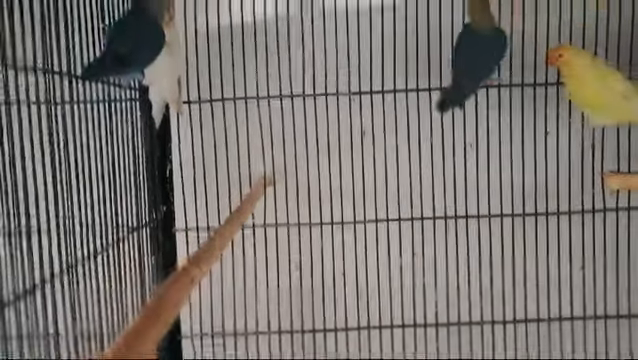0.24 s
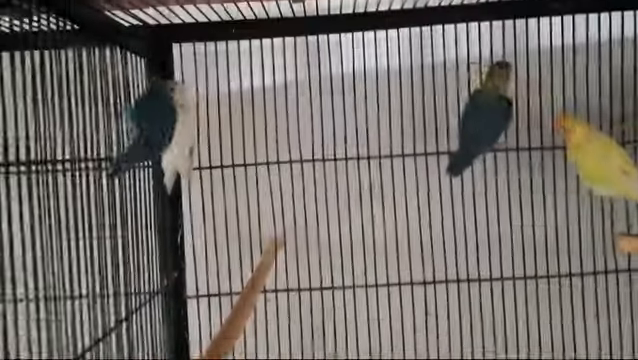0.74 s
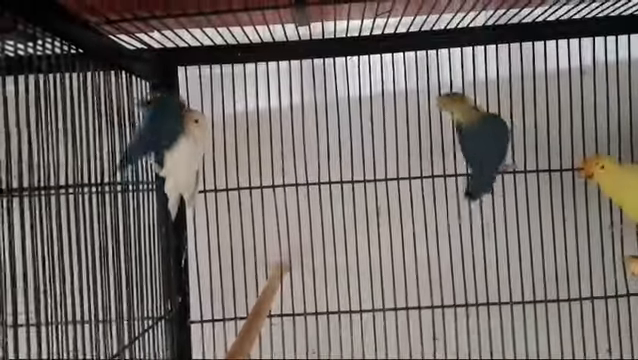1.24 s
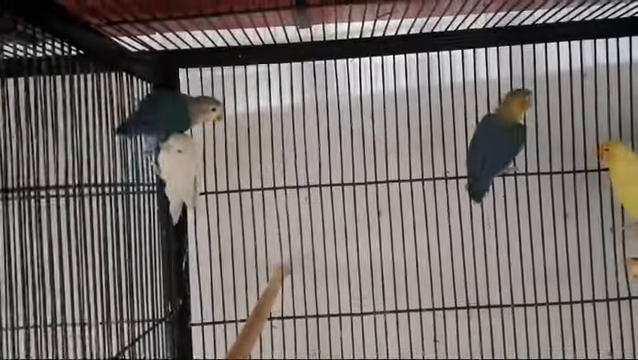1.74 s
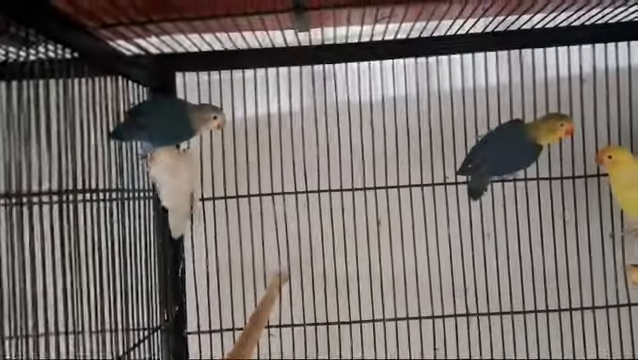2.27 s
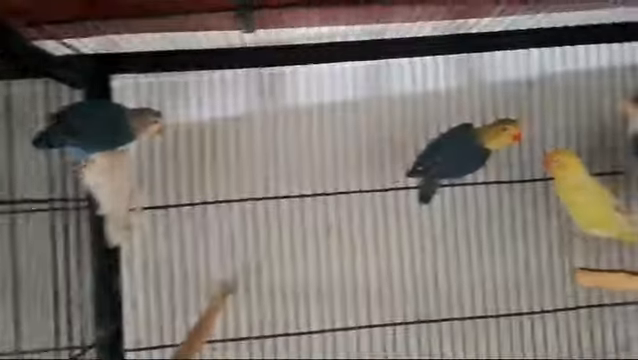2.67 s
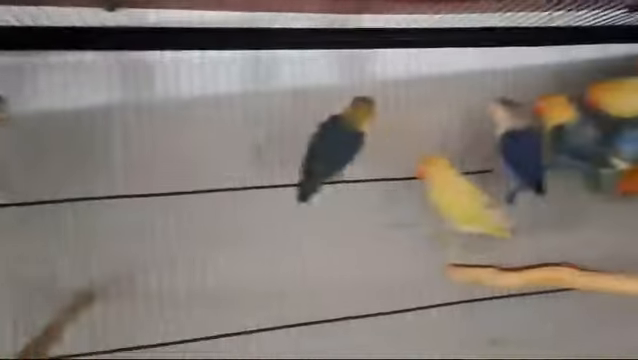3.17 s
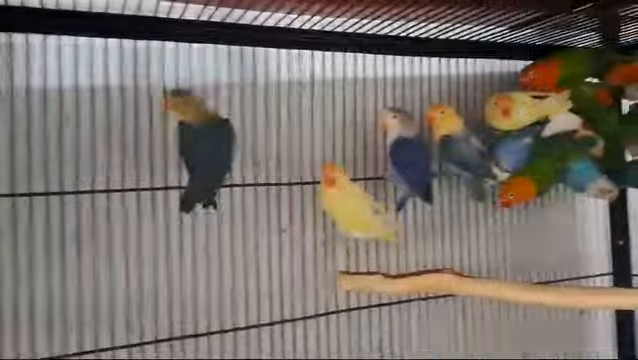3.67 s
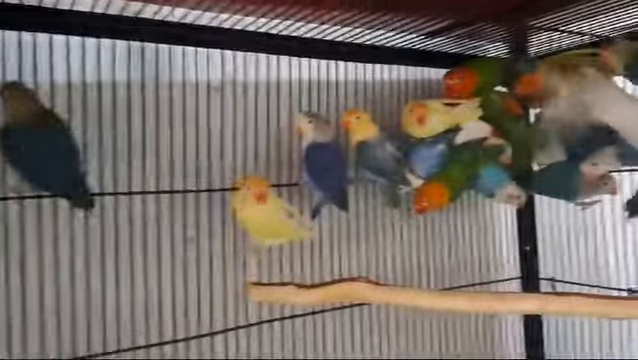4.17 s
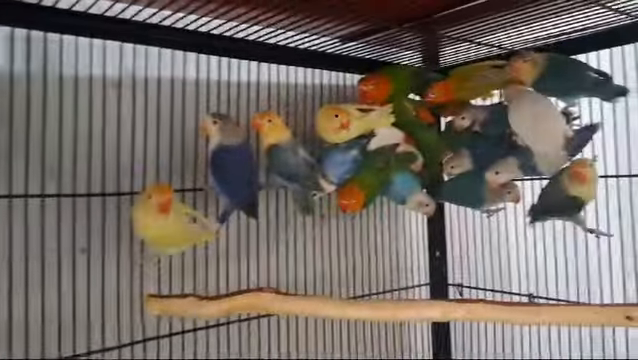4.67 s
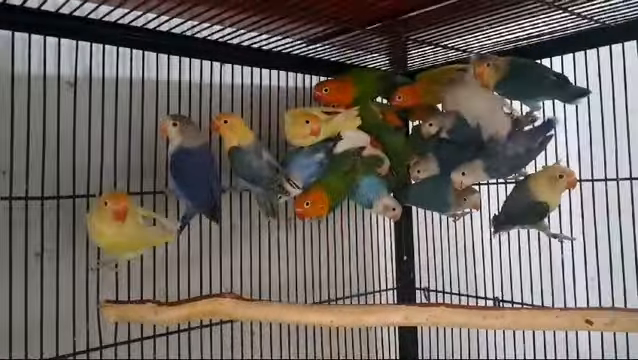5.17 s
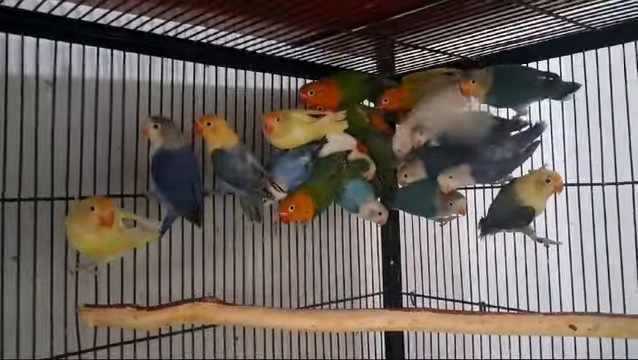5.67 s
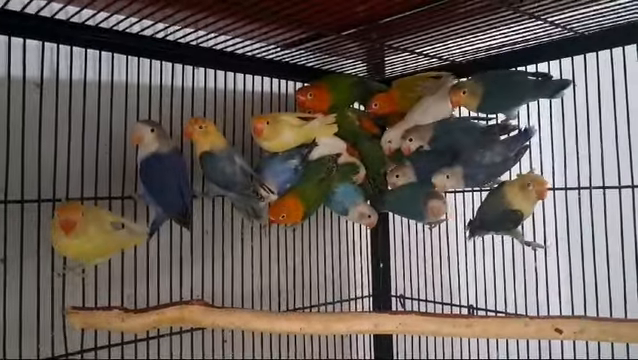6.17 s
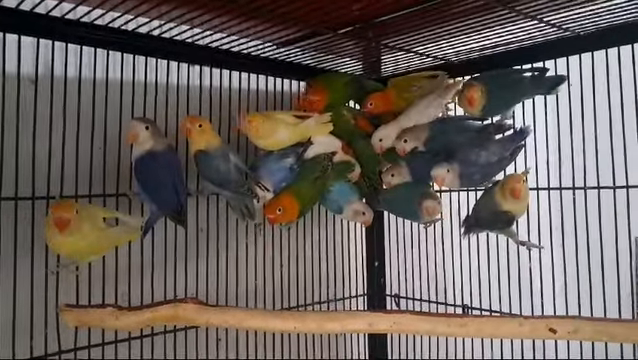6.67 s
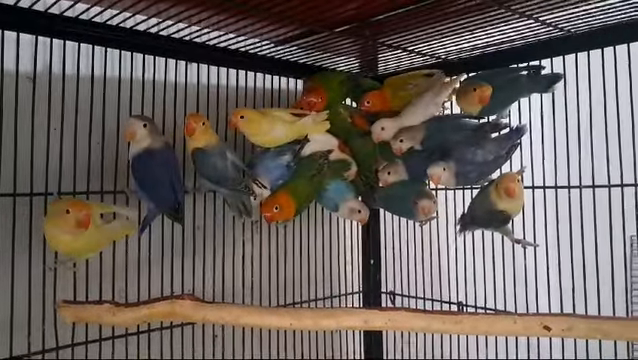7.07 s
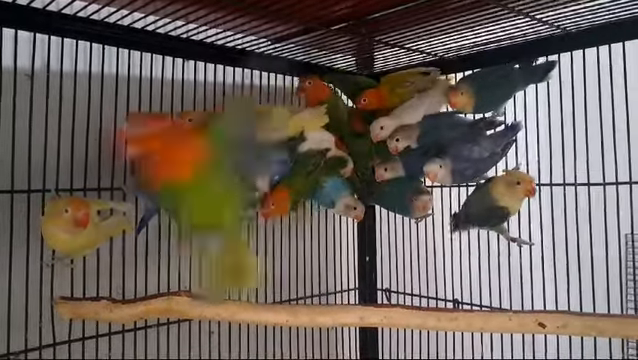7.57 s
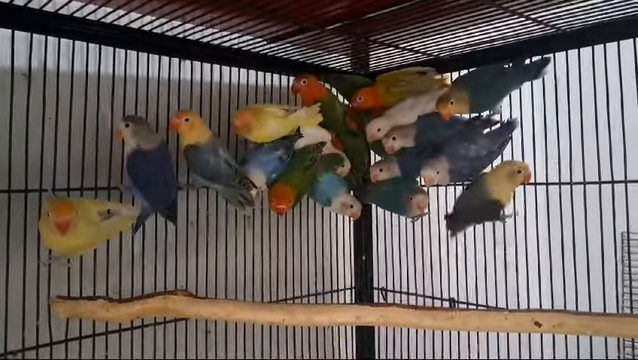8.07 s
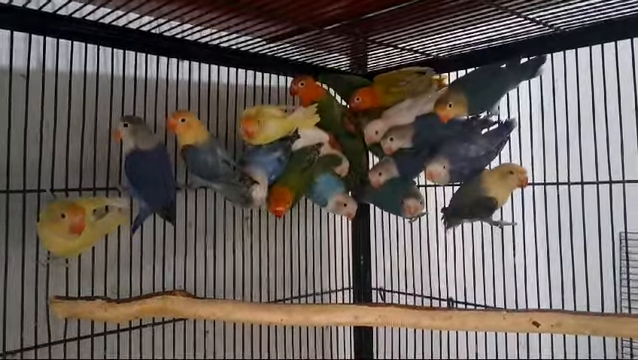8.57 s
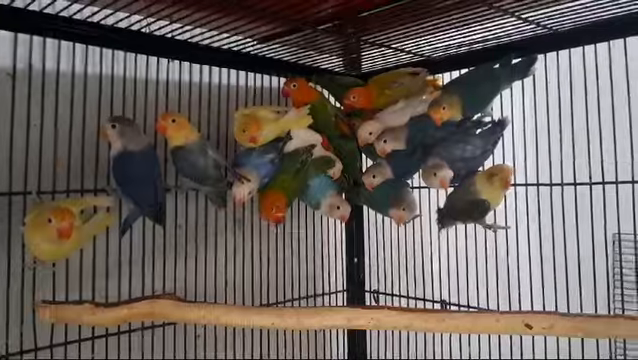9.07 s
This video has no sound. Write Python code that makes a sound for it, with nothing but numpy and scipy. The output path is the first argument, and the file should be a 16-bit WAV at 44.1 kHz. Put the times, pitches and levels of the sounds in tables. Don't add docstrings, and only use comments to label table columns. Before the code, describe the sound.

Indoor aviary heard at arm's length: piercing, very short peeps, buzzy squeaks and tick-like calls overlap irregularly with tiny lulls. Bursts thicken around the middle, followed by rough, rapidly chopped squawks and two climbing trills. A faint wing flutter passes late, over slightly stronger low rumble, and a final few bright chirps ring off hard walls. Stereo, leaning a little right, with distant flock calls behind.

```python
import sys
import numpy as np
from scipy import signal
from scipy.fft import rfft, irfft, next_fast_len
from scipy.io import wavfile
from scipy.ndimage import uniform_filter1d, minimum_filter1d, map_coordinates

SR = 44100
rng = np.random.default_rng(int(sys.argv[2]) if len(sys.argv) > 2 else 0)


def volts_from_db(level):
    exponent = np.asarray(level, float) / 20
    return 10 ** exponent


def bounce(signal):
    frames = np.transpose(np.atleast_2d(signal))
    limited = np.clip(frames, -1, 1)
    pcm = np.round(limited * 32767).astype(np.int16)
    wavfile.write(sys.argv[1], SR, pcm)


N = 411453


def unit(x):
    return x / np.sqrt(np.mean(x ** 2) + 1e-20)


def along(points, hz):
    f, v = np.transpose(points)
    return np.interp(np.log(hz + 1), np.log(f + 1), v)


def curves(rows):
    s, *cols = np.transpose(rows)
    return [np.interp(np.arange(N) / SR, s, c) for c in cols]


def wobble(size, rate):
    count = size // 8 + 8
    knots = rng.standard_normal(max(count, 3000))[:count]
    return map_coordinates(knots, [np.arange(size) * min(rate / SR, 1 / 8)])


def filtered(x, response):
    m = next_fast_len(N + SR // 2)
    spectrum = rfft(x, m) * response(np.fft.rfftfreq(m, 1 / SR))
    return irfft(spectrum, m)[..., :N]


# (frequency [Hz], gain [dB])
BEAK_GAIN = [(880, -84), (1500, -66), (1940, -12), (2210, -15.5), (3380, -3), (4240, -3), (4970, -0.5),
             (5380, -4.5), (6700, -5.5), (8160, -19), (9470, -17), (12400, -15.5), (16000, -31)]


def syrinx(pitch_hz, tilt_db, jitter, flutter_db, breath, wander=0.01126):
    size = len(pitch_hz)
    pitch_hz = pitch_hz * (1 + jitter * wobble(size, rate=900) + wander * wobble(size, rate=70))
    k = np.arange(1, 9)[:, None]
    gain_db = along(BEAK_GAIN, np.abs(k * pitch_hz)) + tilt_db * np.log2(k)
    gain = volts_from_db(gain_db) * (k * pitch_hz < SR / 2)
    gain = gain * volts_from_db(rng.normal(0, 2, k.shape))
    gain = gain / gain.mean(axis=1).max()
    turns = k * np.cumsum(pitch_hz) / SR + rng.random(k.shape)
    tone = np.sum(gain * np.sin(2 * np.pi * turns), axis=0)
    flutter = volts_from_db(flutter_db * wobble(size, rate=272))
    return np.sqrt(2) * tone * flutter * (1 + breath * wobble(size, rate=3500))


# (time [s], left-right level [dB])
PHONE_TURN = [(0.0, -3.5), (1.2, -4.5), (1.7, -4.5), (2.2, -3.5), (3.7, -2.5), (4.2, -3), (5.1, -6),
              (7.7, -5), (8.2, -5), (9.33, -7.5)]


def add(out, sound, s):
    pan_db = np.interp(s, *np.transpose(PHONE_TURN)) + rng.normal(0, 2.7)
    left = round(s * SR)
    right = left + rng.integers(14, 23)
    out[0, left:][:len(sound)] += volts_from_db(pan_db / 2) * sound
    out[1, right:][:len(sound)] += volts_from_db(-pan_db / 2) * sound


def notes(rows, scoop, crack, jitter, flutter_db, breath, snap=0, fade_db=0):
    out, last_s, last_hz = np.zeros((2, N + SR)), -1, 1
    for s, length, start_hz, end_hz, db, tilt_db in rows:
        u = np.linspace(0, 1, max(round(length * SR), 32))
        fresh = s - last_s > .006 or abs(start_hz / last_hz - 1) > .06
        onset = fresh * np.exp(-u * length / 0.00418)
        leap = snap * (length < .016) * np.exp((u - 1) * length / .0025)
        pitch_hz = (start_hz + (end_hz - start_hz) * u) * (1 - scoop * onset + leap)
        opening = np.minimum(1, u * length / 0.001)
        closing = np.sqrt(np.clip((1 - u) * 5, 0, 1)) * volts_from_db(fade_db * u)
        unsteady = jitter + crack * onset + leap / 2
        voice = syrinx(pitch_hz, tilt_db, unsteady, flutter_db, breath)
        add(out, volts_from_db(db) * opening * closing * voice, s)
        last_s, last_hz = s + length, end_hz
    return out[:, :N]


# (time [s], length [s], start pitch [Hz], end pitch [Hz], level [dB])
SQUEAKS = [(.206, 0.024, 2220, 2230, -27), (.27, 0.018, 2553, 2580, -29), (1.02, 0.026, 2030, 2150, -17.5),
           (1.045, 0.045, 2230, 2320, -17), (1.245, 0.049, 2350, 2290, -34),
           (1.465, 0.038, 2280, 2460, -20.5), (2.11, 0.066, 2117, 2385, -30),
           (2.896, 0.035, 2076, 2310, -21.5), (2.923, 0.017, 2453, 2320, -19),
           (2.94, 0.03, 2340, 2416, -17), (2.966, .028, 2443, 2634, -15.5),
           (3.297, 0.019, 1834, 2136, -23.5), (3.46, 0.064, 2380, 2660, -29),
           (3.62, 0.011, 2120, 2040, -27), (3.803, 0.068, 2037, 2380, -22),
           (4.043, 0.0108, 2100, 2100, -32), (5.122, 0.026, 2164, 2270, -18.5),
           (5.52, 0.0074, 2160, 2250, -26), (6.893, 0.016, 2214, 2116, -28), (6.88, 0.017, 3170, 3050, -22),
           (7.275, 0.037, 2750, 3160, -24.5), (7.637, 0.039, 2738, 2510, -20.5),
           (8.557, 0.024, 2230, 2350, -37.5), (9.122, 0.012, 2017, 2100, -24)]
# (time [s], low pitch [Hz], high pitch [Hz], whistle length [s], level [dB])
CHIRPS = [(1.215, 2266, 5650, 0.02, -10), (3.312, 2260, 5480, 0.0286, -12.5),
          (4.132, 2058, 5270, 0.028, -13.5), (4.292, 1857, 6420, 0.02, -23.5),
          (4.369, 2083, 5320, 0.033, -11.5), (4.454, 2014, 6220, 0.043, -18.5),
          (4.598, 2134, 5340, 0.0315, -13), (4.848, 2195, 5310, 0.021, -12.5),
          (5.364, 2234, 5380, 0.023, -13), (5.46, 2480, 5415, .014, -11), (5.652, 2220, 5840, 0.026, -17),
          (5.75, 2263, 5670, 0.02, -17.5), (5.83, 2283, 5760, 0.0352, -20), (8.715, 2224, 6280, 0.028, -15),
          (8.92, 2116, 5970, 0.039, -17)]
# (time [s], low pitch [Hz], high pitch [Hz], whistle length [s], level [dB])
SHRIEKS = [
    (5.248, 2100, 6130, 0.027, -18),
    (5.555, 2253, 5780, 0.022, -20.5),
    (6.19, 1873, 6210, 0.019, -18.5),
    (8.045, 2104, 6180, 0.03, -21),
]


def squeaks():
    length_s, rise, quieter_db = 0.015, 0.039, -2.4
    leads = [(s, length_s, low, low * (1 + rise), db + quieter_db)
             for s, low, high, hold, db in CHIRPS + SHRIEKS]
    return [(*row, 4 + 0.37 * (row[-1] + 13.5)) for row in sorted(SQUEAKS + leads)]


# (time [s], length [s], pitch [Hz], level [dB])
PIPES = [(.001, 0.005, 5800, -20), (.14, 0.022, 5900, -25.5), (.203, 0.014, 6000, -15.5),
         (.866, 0.027, 6820, -12.5), (1.003, 0.038, 6080, -14.5), (1.045, 0.055, 6710, -12.5),
         (1.128, .014, 5500, -15), (1.15, 0.0062, 5970, -11), (1.245, 0.01, 7360, -18),
         (1.27, 0.0057, 6740, -16), (1.295, 0.0081, 5230, -12.5), (1.303, 0.0095, 6600, -15),
         (1.33, 0.011, 5550, -20), (1.408, 0.011, 4720, -21), (1.447, 0.018, 5410, -15),
         (1.465, 0.025, 5100, -18), (1.518, 0.0076, 5520, -15), (1.575, 0.014, 4850, -17),
         (1.712, 0.0073, 5750, -22), (2.03, 0.031, 4030, -26), (2.065, 0.024, 5625, -15.5),
         (2.14, 0.043, 4710, -34.5), (2.172, 0.037, 5590, -16), (2.99, 0.041, 5164, -13),
         (2.995, 0.025, 6520, -11.5), (3.346, 0.012, 6480, -8.5), (3.499, 0.034, 5350, -11),
         (3.564, 0.036, 6670, -15.5), (3.62, 0.037, 5830, -30),
         (5.125, .024, 4350, -16), (5.147, 0.042, 6020, -16), (5.148, 0.024, 5350, -15.5),
          (5.472, 0.011, 4320, -14), (5.491, 0.013, 5084, -11.5), (5.204, 0.014, 4430, -16.5),
          (5.575, 0.015, 4990, -15), (5.671, 0.028, 5180, -17), (5.841, 0.038, 6570, -21),
          (5.773, 0.022, 5050, -19), (5.797, 0.034, 4276, -20), (6.235, 0.033, 6240, -24.5),
          (6.306, 0.024, 5970, -25), (6.555, 0.0082, 6030, -24), (6.643, 0.015, 6430, -12),
          (6.834, 0.0094, 4110, -35), (6.837, 0.023, 6320, -22), (6.853, 0.015, 6380, -15),
          (6.967, 0.064, 5910, -24.5), (7.023, 0.032, 6020, -22), (7.308, 0.024, 5260, -24.5),
          (7.335, .012, 4580, -24), (7.443, 0.039, 4800, -23), (7.627, 0.014, 4610, -18.5),
          (7.664, 0.021, 5170, -17), (7.8, 0.022, 4870, -18.5), (8.056, .026, 6090, -18),
          (8.566, 0.082, 6560, -36.5), (9.129, 0.036, 4270, -15), (9.171, 0.04, 6430, -10)]
# (time [s], length [s], middle pitch [Hz], level [dB])
FALLS = [(.228, .012, 6450, -34.5), (.636, 0.012, 6300, -4), (.649, .01, 5460, -18.5),
         (.825, 0.024, 6700, -12), (.843, 0.0053, 5660, -14), (.848, 0.015, 4420, -13),
         (1.1, .05, 6010, -16.5), (1.232, 0.035, 5740, -29.5), (1.345, 0.026, 5010, -19.5),
         (1.496, 0.012, 6240, -10), (3.562, 0.023, 5410, -12.5), (3.847, 0.0245, 6350, -14),
         (3.873, 0.027, 6530, -11), (3.894, 0.021, 5450, -9), (6.081, 0.038, 6120, -16.5),
         (6.347, 0.045, 6130, -19.5), (6.496, 0.031, 5980, -17.5), (6.614, 0.037, 5720, -16.5),
         (6.767, 0.04, 5780, -17.5), (6.908, .036, 5750, -14), (7.05, 0.04, 5900, -18.5),
         (7.703, 0.018, 6400, -20.5), (7.716, 0.034, 5680, -16.5), (7.84, 0.037, 5455, -15),
         (7.958, 0.031, 5390, -15), (8.751, 0.025, 5450, -13.5)]
# (time [s], length [s], middle pitch [Hz], level [dB])
RISES = [(.661, 0.028, 6500, -14), (1.225, 0.027, 4630, -30), (1.423, 0.021, 4520, -17.5),
         (2.11, 0.027, 6140, -35), (2.972, 0.013, 6200, -21), (3.325, .02, 6260, -20),
         (3.425, .022, 6270, -18), (3.494, 0.014, 5850, -18), (3.524, 0.02, 4380, -11.5),
         (3.546, 0.0085, 4900, -8), (5.06, 0.0198, 4230, -16), (5.392, 0.0091, 6000, -20),
         (5.539, 0.052, 6300, -22), (5.71, .03, 6150, -18.5), (8.721, 0.017, 4965, -19.5),
         (9.162, .009, 4730, -19)]


def whistles():
    break_s = 0.011
    tops, shrieks = ([(s + break_s, hold, high, db) for s, low, high, hold, db in rows]
                     for rows in (CHIRPS, SHRIEKS))
    # (whistles, glide as a share of pitch, brightness [dB per octave])
    kinds = [(peeps(), 0.069, 8.5), (shrieks, 0.036, 12.3), (tops, -0.032, 1),
             (PIPES, 0.015, -2.5), (FALLS, -0.07, 0.027), (RISES, 0.06, 1)]
    return sorted((s, length, hz * (1 - glide / 2), hz * (1 + glide / 2), db, tilt_db)
                  for rows, glide, tilt_db in kinds for s, length, hz, db in rows)


# (time [s], peak level [dB])
TICKS = [(0.0502, -13.5), (0.074, -14.5), (0.141, -7.5), (0.2684, -14.5), (0.3702, -10), (.624, -14.5),
         (0.818, -7.5), (0.91, -32), (.978, -20), (0.988, -7), (1.358, -27), (1.5646, -11.5), (3.423, -3),
         (4.0557, -13), (4.568, -22), (4.688, -9.5), (4.748, -12.5), (4.805, -19), (4.908, -18),
         (4.933, -13), (4.996, -17), (5.034, -11), (5.094, -6), (5.194, -10), (6.0762, -7.5), (6.1407, -7),
         (6.834, -15), (6.884, -30), (7.445, -13), (7.9428, -12.5)]
# (first time [s], gap [s], first level [dB], swell [dB per tick])
RUNS = [
    (.435, .067, -13.5, 1.3),
    (1.643, .0952, -11, .2),
]
RUN_COUNTS = (6, 5)


def ticks():
    runs = [(s + k * gap, db + k * swell)
            for (s, gap, db, swell), count in zip(RUNS, RUN_COUNTS) for k in range(count)]
    rows = [(max(s - .002, 0), .01, 2300, 4000, db - 14, 2.5) for s, db in runs + TICKS]
    return notes(rows, scoop=0.06, crack=0.049, jitter=0.16, flutter_db=3, breath=0.77, fade_db=-12)


def peeps():
    first, gap = RUNS[-1][:2]
    after_s, length_s, pitch_hz, db = 0.0099, 0.024, 4520, -23.5
    return [(first + k * gap + after_s, length_s, pitch_hz, db) for k in range(RUN_COUNTS[-1] - 1)]


def chopped(tracks, beat, depth, **voice):
    out = np.zeros((2, N + SR))
    for rows in tracks:
        s, pitch_hz, db = np.transpose(rows)
        t = np.arange(s[0], s[-1], 1 / SR)
        turns = np.cumsum(beat * (1 + 0.067 * wobble(len(t), rate=43))) / SR
        chop = np.abs(np.sin(np.pi * turns)) ** depth
        closing = np.minimum(1, (s[-1] - t) / 0.021)
        level = volts_from_db(np.interp(t, s, db) + 1.5)
        add(out, level * chop * closing * syrinx(np.interp(t, s, pitch_hz), **voice), s[0])
    return out[:, :N]


# (time [s], pitch [Hz], level [dB])
TRILLS = [
    [(6.35, 3280, -21), (6.4, 3670, -13.5), (6.46, 4290, -7), (6.54, 4520, -22), (6.75, 4970, -23)],
    [(7.06, 3677, -13), (7.11, 3940, -8.5), (7.16, 4283, -10), (7.2, 4450, -17), (7.24, 4450, -43)],
]


def trills():
    return chopped(TRILLS, beat=128, depth=7, tilt_db=-10, jitter=.018, flutter_db=1.5, breath=.2)


# (time [s], length [s], start pitch [Hz], end pitch [Hz], level [dB])
SQUAWKS = [
    (0.299, 0.043, 2282, 2310, -25),
    (6.286, 0.24, 2362, 2800, -27.5),
    (6.545, 0.25, 2310, 2505, -26),
    (6.966, .07, 2950, 2504, -20),
    (7.049, .13, 2740, 2455, -18),
    (7.244, 0.12, 2575, 3070, -24.5),
    (7.459, 0.11, 2596, 2610, -18.5),
    (7.654, 0.06, 2580, 2466, -22.5),
    (7.772, 0.077, 2570, 2262, -20),
]


def squawks():
    fade_db = 0.5
    tracks = [[(s, start_hz, db), (s + length, end_hz, db - fade_db)]
              for s, length, start_hz, end_hz, db in SQUAWKS]
    return chopped(tracks, beat=150, depth=.9, tilt_db=4, jitter=.065, flutter_db=2, breath=.25, wander=.035)


# (time [s], level [dB])
FLOCK = [(0, -36.5), (.2, -28), (.45, -41.5), (1.19, -25.5), (1.25, -18.5), (1.7, -32), (2.15, -25),
         (2.25, -71), (3.3, -50), (3.45, -20.5), (4.4, -48.5), (4.8, -24.5), (5.4, -40), (6.3, -22),
         (7.4, -30.5), (8.06, -75), (8.52, -52), (9.33, -46)]


def flock(count=420):
    when, long, pitch, glide, loud, bright, high = rng.random((count, 7)).T
    s = (np.arange(count) + when) * N / SR / count
    start_hz = np.where(high > .45, 4100 + 2700 * pitch, 2050 + 500 * pitch)
    end_hz = start_hz * (.95 + 0.198 * glide)
    rows = np.transpose([s, 0.0088 + 0.0289 * long, start_hz, end_hz, 6 * loud, 6 * bright - 2.5])
    calls = notes(rows, scoop=0.1052, crack=0.07, jitter=0.032, flutter_db=3.5, breath=.4)
    return volts_from_db(curves(FLOCK)[0]) * unit(calls)


# (frequency [Hz], time to fall 60 dB [s])
WALLS = [(2000, 0.82), (6000, 0.47), (12000, 0.32)]


def room(x, span=.4):
    out, step = np.zeros((2, N + 2 * SR)), round(span * SR)
    for i in range(0, N, step):
        hz, t, z = signal.stft(rng.standard_normal((2, SR * 3 // 4)), SR, nperseg=256)
        decay = volts_from_db(-60 * t / along(WALLS, hz)[:, None])
        tail = signal.istft(z * decay, SR, nperseg=256)[1]
        wet = signal.fftconvolve(x[:, i:i + step], tail / np.linalg.norm(tail[0]), axes=1)
        out[:, i + 130:][:, :wet.shape[1]] += wet
    return out[:, :N]


# (frequency [Hz], left-right level [dB])
SHADE = [(2500, 3), (6000, -1.5), (9000, 1.5), (12500, -3)]


def phone_ports(birds):
    def colour(hz):
        shade_db = along(SHADE, hz) * np.array([[.5], [-.5]])
        notch_db = -3 * np.exp(-((hz - 7760) / 594) ** 2)
        return volts_from_db(shade_db + notch_db) / (1 + (1850 / (hz + 1)) ** 12)
    return filtered(birds, colour)


# (frequency [Hz], left-right likeness [-1 to 1])
ALIKE = [(60, 0.95), (240, 0.95), (950, 0.13), (3770, -0.18), (15000, 0.25)]


def rush(spectrum):
    def response(hz):
        turn = np.arccos(np.clip(along(ALIKE, hz), -1, 1)) / 2
        return volts_from_db(along(spectrum, hz)) * [np.cos(turn), np.sin(turn)]
    mid, side = filtered(rng.standard_normal((2, N)), response)
    return unit(np.array([mid + side, mid - side]))


# (time [s], level [dB])
FLIGHT = [
    (7.5, -96),
    (7.9, -61),
    (8.12, -52),
    (8.3, -55.5),
    (8.5, -59),
    (8.7, -50),
    (9.0, -85),
]
# (frequency [Hz], density [dB per Hz])
FEATHERS = [(880, -39), (1500, -28), (2880, -6), (6060, -22.5), (7610, -16), (16000, -21)]


def wings(beat=19):
    turns = np.cumsum(beat * (1 + .15 * wobble(N, rate=5.3))) / SR
    flap = np.sin(2 * np.pi * turns)
    return volts_from_db(curves(FLIGHT)[0] + 2.5 * flap) * rush(FEATHERS)


# (time [s], rumble level [dB], air level [dB])
HOUSE = [(0, -50, -47.5), (.5, -53, -46.5), (1, -49.5, -47), (2.3, -53, -51.5), (2.65, -51.5, -48),
         (2.9, -57, -45.5), (3.6, -48, -45.5), (4.6, -55, -48), (5.2, -51.5, -45), (5.4, -47.5, -52.5),
         (7.1, -54.5, -50.5), (7.6, -39.5, -43.5), (8.3, -40, -46.5), (8.6, -40.5, -45.5), (9.33, -53, -47)]
# (frequency [Hz], density [dB per Hz])
RUMBLE = [(12, -35), (27, -10.5), (43, 0.5), (59, 6.5), (118, -12), (130, -7), (170, -58), (290, -120)]
# (frequency [Hz], density [dB per Hz])
AIR = [(65, -48.5), (110, -9.5), (157, 0.5), (233, -3.5), (353, -0.5), (376, -5), (1290, -10),
       (2120, -11.5), (3200, -23), (5530, -31.5), (9000, -50.5), (16000, -58.5)]


def house():
    rumble_db, air_db = curves(HOUSE)
    rumble = volts_from_db(rumble_db + 1.4 * wobble(N, rate=18)) * rush(RUMBLE) * volts_from_db([[.8], [-.8]])
    air = volts_from_db(air_db + 1.62 * wobble(N, rate=4.5)) * rush(AIR)
    return rumble + air


def scene():
    near = notes(squeaks(), scoop=.04, crack=.05, jitter=.01, flutter_db=2, breath=.18, snap=.35)
    near += notes(whistles(), scoop=.06, crack=.05, jitter=.014, flutter_db=3.2, breath=.18)
    near += trills()
    near += squawks()
    near += ticks()
    far = flock()
    echo = room(volts_from_db(-8.0) * near + volts_from_db(-1.0) * far)
    birds = near + volts_from_db(-10) * far + echo
    return phone_ports(birds) + wings() + house()


def band_limit(x):
    return signal.sosfilt(signal.butter(12, 16470, fs=SR, output="sos"), x)


def record(dry):
    need = np.minimum(1, .95 / (np.abs(dry).max(axis=0) + 1e-9))
    gain = uniform_filter1d(minimum_filter1d(need, size=177), size=89)
    mix = filtered(dry * gain, lambda hz: 1 / (1 + (hz / 15950) ** 80))
    return band_limit(mix)


dry = scene()
out = record(dry)
bounce(out)
```